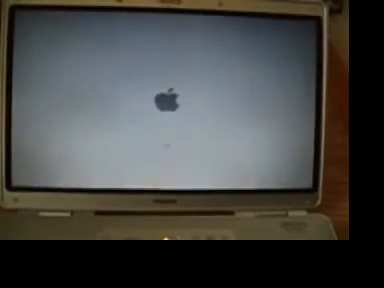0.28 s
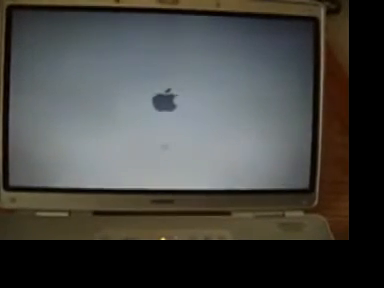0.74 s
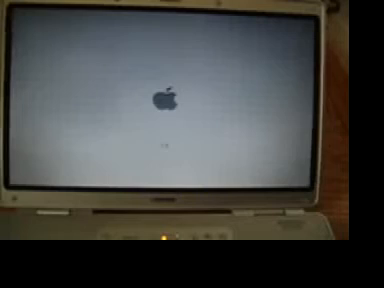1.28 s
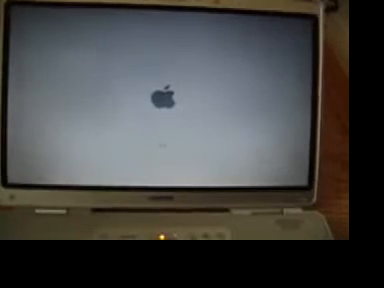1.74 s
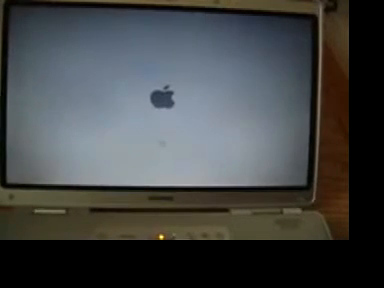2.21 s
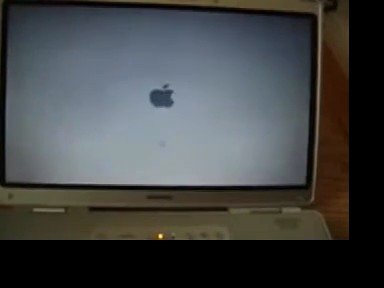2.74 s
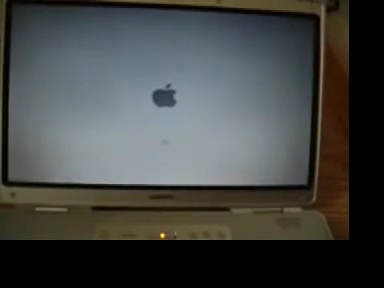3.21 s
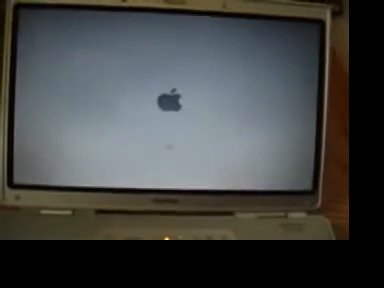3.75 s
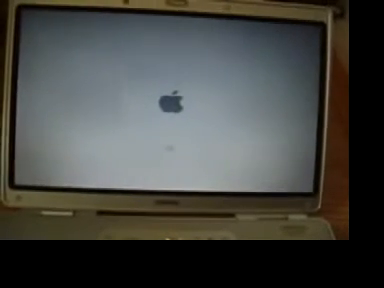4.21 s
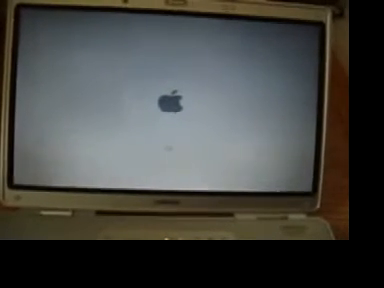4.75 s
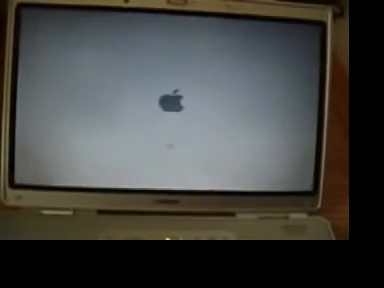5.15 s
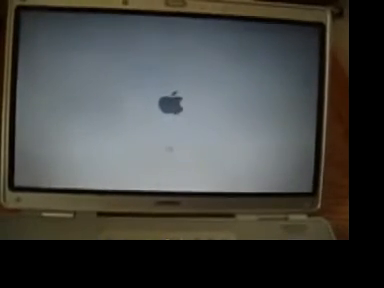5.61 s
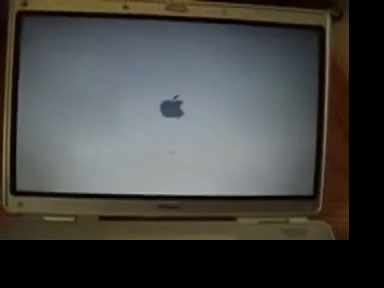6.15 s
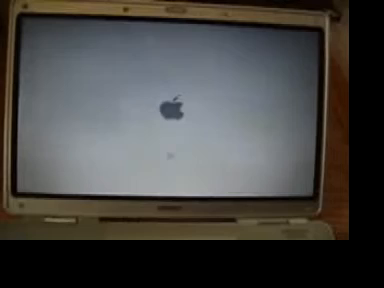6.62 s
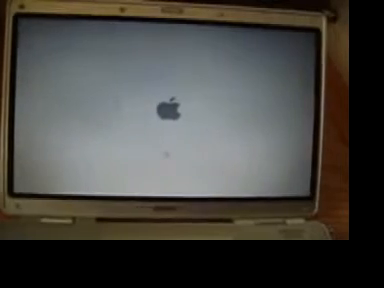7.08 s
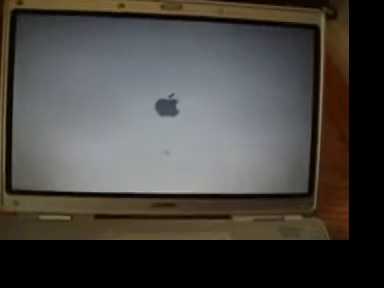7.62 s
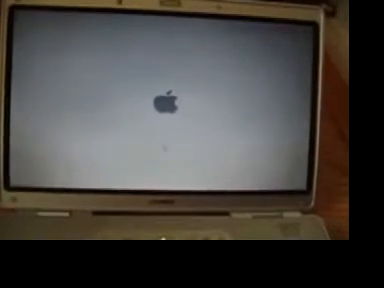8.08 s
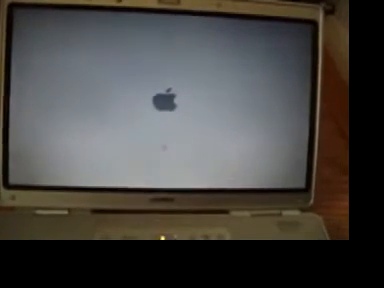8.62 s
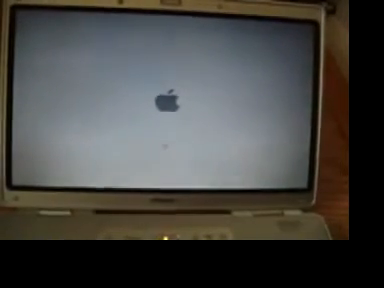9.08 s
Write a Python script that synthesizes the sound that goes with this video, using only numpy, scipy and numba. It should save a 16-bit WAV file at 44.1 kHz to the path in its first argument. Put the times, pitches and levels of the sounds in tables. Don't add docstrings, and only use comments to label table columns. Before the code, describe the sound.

Close, gritty fan noise from a laptop holds a steady nasal whine, with dull taps midway and a brief dry rattle at the end.

```python
import sys
import numpy as np
from scipy import signal
from scipy.fft import rfft, irfft
from scipy.io import wavfile
from scipy.ndimage import uniform_filter1d
from numba import njit

SR = 44100
rng = np.random.default_rng(int(sys.argv[2]) if len(sys.argv) > 2 else 0)


def volts(x):
    e = np.asarray(x, float) / 20
    return 10 ** e


def to_wav(sig):
    pcm = np.clip(np.atleast_2d(sig), -1, 1) * 32767
    pcm = np.round(pcm).astype(np.int16)
    wavfile.write(sys.argv[1], SR, pcm.T)


N = 412335


def evened(x):
    return x / np.sqrt(np.mean(x ** 2) + 1e-20)


def read(points, hz):
    point_hz, value = np.transpose(points)
    return np.interp(np.log(hz + 1), np.log(point_hz + 1), value)


def drift(top_hz):
    t = np.arange(0, N + 512, 512) / SR
    waves = 0
    for hz in np.geomspace(.08, top_hz, num=16):
        waves = waves + np.sin(2 * np.pi * (hz * t + rng.random())) / np.sqrt(hz)
    return np.interp(np.arange(N) / SR, t, evened(waves))


# [pitch_hz, level_db (per Hz)]
RUSH_SPECTRUM = [(25, -80), (52, -78.5), (72, -70), (105, -70.5), (150, -74.5), (205, -68.5), (410, -70),
                 (480, -64.5), (720, -60.5), (1130, -68.5), (1240, -72.5), (2000, -74.5), (3700, -77.5),
                 (4800, -81.5)]
# [pitch_hz, width_hz, boost_db]
CASE_RESONANCES = [(515, 40, 3.5), (760, 50, 3), (1021, 90, 2.5), (1114, 35, 4), (1170, 25, 1.5),
                   (1377, 20, 4), (2190, 120, 3), (1472, 42, 1), (1634, 28, 1), (1747, 45, 2),
                   (3110, 90, 3), (3740, 200, 0.5), (4720, 220, 2)]


def air_rush():
    hz = np.fft.rfftfreq(N, 1 / SR)
    colour_db = read(RUSH_SPECTRUM, hz)
    for centre_hz, width_hz, boost_db in CASE_RESONANCES:
        colour_db = colour_db + boost_db / (1 + (2 * (hz - centre_hz) / width_hz) ** 2)

    ripple = rng.standard_normal(len(hz))
    for _ in range(2):
        ripple = uniform_filter1d(ripple, size=200)
    colour_db = colour_db + 1.1 * evened(ripple) * np.clip(hz / 1000 - .5, 0, 1)

    white = rfft(rng.standard_normal(N))
    air = irfft(white * volts(colour_db) * np.sqrt(SR / 2), N)
    return air * volts(0.14 * drift(2))


# [pitch_hz, level_db]
HUM_TONES = [(99.9, -57), (184.2, -57), (199.4, -60), (2771.2, -65), (2835.4, -68), (3327.3, -70),
             (3718.5, -66), (4094.8, -62), (4159.1, -70), (4332.6, -73)]
# [wobble_order (beside the whine), level_db]
WHINE_SIDES = [(-2, -67), (-1, -63), (0, -54.5), (1, -70), (2, -67)]


def motor_and_hum():
    whine_hz, wobble_hz = 3660.8, 15.05
    t = np.cumsum(1 + 5e-5 * drift(1)) / SR
    tones = HUM_TONES + [(whine_hz + order * wobble_hz, db) for order, db in WHINE_SIDES]
    return sum(np.sqrt(2) * volts(db) * np.sin(2 * np.pi * (hz * t + rng.random())) for hz, db in tones)


# [start_s, level_db, pitch_hz]
HAND_BUMPS = [(3.03, -58, 30), (3.47, -49, 31), (5.62, -51.5, 82), (6.368, -41, 84), (6.36, -49, 19),
              (6.415, -44, 78), (6.49, -50, 74), (6.57, -55, 95), (6.56, -58, 18), (7.8, -50, 21),
              (8.0, -53.5, 19), (8.47, -48, 24)]
# [start_s, level_db]
FINGER_TAPS = [
    (4.825, -43.5),
    (4.93, -46.5),
    (5.01, -43.5),
    (5.112, -39.5),
    (5.18, -42),
]


def hands():
    tap_hz = 112.4
    t, out = np.arange(N) / SR, np.zeros(N)
    for start_s, db, hz in HAND_BUMPS + [(start_s, db, tap_hz) for start_s, db in FINGER_TAPS]:
        since = np.maximum(t - start_s, 0)
        length_s = 0.026 * (100 / hz) ** .7
        rise = 1 - np.exp(-(since / (0.38 * length_s)) ** 2)
        fall = np.exp(1 - since / length_s)
        out += np.sqrt(2) * volts(db) * rise * fall * np.sin(2 * np.pi * hz * since)
    return out


# [peak_s, level_db]
ARM_RATTLES = [
    (9.198, -40),
    (9.215, -46),
    (9.235, -42),
    (9.26, -46),
    (9.29, -45),
    (9.315, -47),
]


def disk_arm():
    centre_hz, puff_s = 3200, .009
    t = np.arange(N) / SR
    band = signal.butter(1, [centre_hz * .65, centre_hz * 1.4], "band", fs=SR)
    puffs = sum(volts(db) * np.exp(-((t - peak_s) / puff_s) ** 2) for peak_s, db in ARM_RATTLES)
    return puffs * evened(signal.lfilter(*band, rng.standard_normal(N)))


WHINING_FAN = 55.125, .00012, [(7, -55), (8, -57), (11, -52), (13, -30.5), (14, -50), (15, -47), (16, -51),
               (24, -54), (26, -54), (39, -61), (52, -63), (65, -68)]
SECOND_FAN = 78.55, .0004, [(1, -61), (2, -61), (6, -56), (7, -55), (8, -43), (9, -52), (11, -57),
              (12, -56), (16, -65), (24, -65), (48, -68), (51, -70)]


def fan(shaft_hz, wander, orders):
    turns = np.cumsum(shaft_hz * (1 + wander * drift(2))) / SR + rng.random()
    out = np.zeros(N)
    for order, db in orders:
        flutter_db = .6 * drift(3.3)
        out += np.sqrt(2) * volts(db + flutter_db) * np.sin(2 * np.pi * order * turns)
    return out


def both_fans():
    clear_s, shadow_db, clear_db = 1.4, -5.5, 1
    shadow = volts(np.interp(np.arange(N) / SR, [0, clear_s], [shadow_db, clear_db]))
    return fan(*WHINING_FAN) + fan(*SECOND_FAN) * shadow


def scene():
    mix = air_rush() + motor_and_hum() + hands() + disk_arm() + both_fans()
    return mix[None]


# [pitch_hz, level_db]
CAMERA_EDGE = [(4800, 0), (5100, -6), (5300, -12), (5500, -23), (5800, -42.5)]


def camera_input(sound):
    slip_s = 2.3612
    hz = np.fft.rfftfreq(N, 1 / SR)
    narrow = irfft(rfft(sound) * volts(read(CAMERA_EDGE, hz)), N) - .0038
    slip = round(slip_s * SR)
    narrow[slip:slip + 3] += .008
    return narrow


@njit
def adaptive_steps(x, moves, growth):
    out, held, step = np.empty_like(x), 0., 1e-3
    for i in range(len(x)):
        gap = x[i] - held
        size = min(int(abs(gap) * 4 / step), 7)
        held += np.sign(gap) * (size + .5) * step / 4
        step = max(step * growth ** moves[size], 2e-4)
        out[i] = held
    return out


def low_pass(x):
    return signal.sosfilt(signal.butter(12, 15740, fs=SR, output="sos"), x)


def record(dry):
    moves = np.array([-1., -1, -1, -1, 2, 4, 6, 8])
    stored = adaptive_steps(camera_input(dry[0]), moves, 1.1)
    return low_pass(stored[None])


dry = scene()
out = record(dry)
to_wav(out)
```